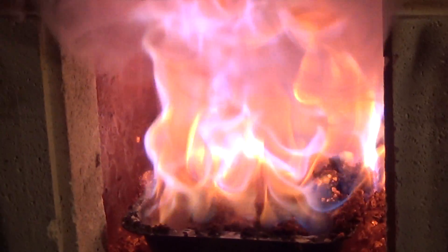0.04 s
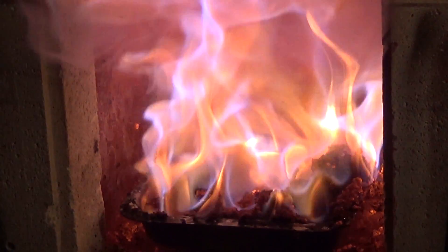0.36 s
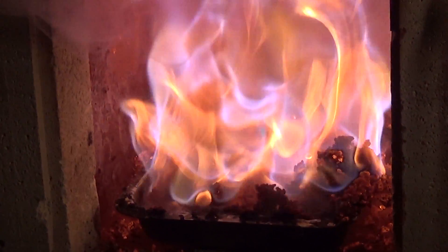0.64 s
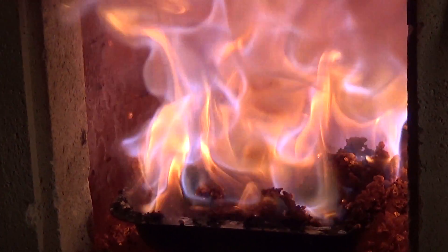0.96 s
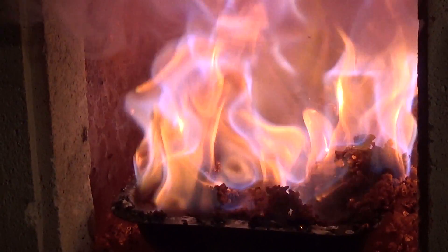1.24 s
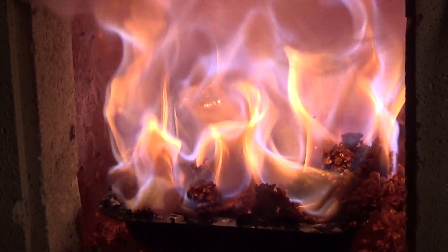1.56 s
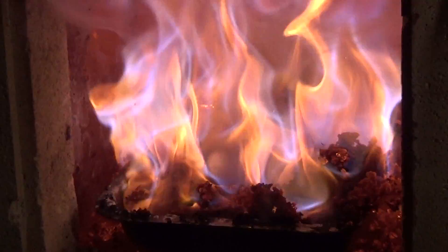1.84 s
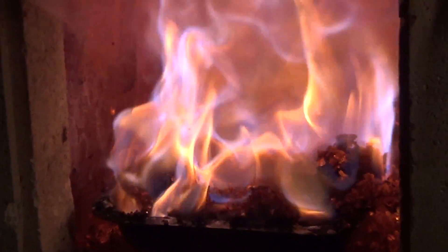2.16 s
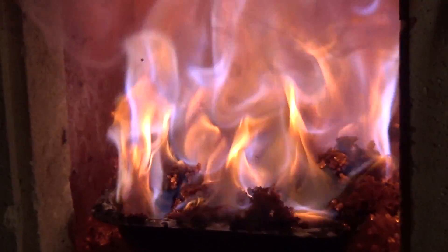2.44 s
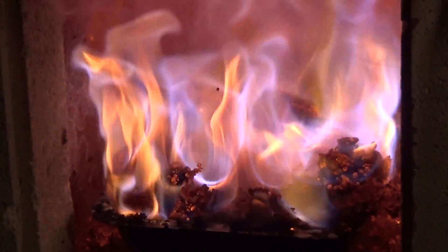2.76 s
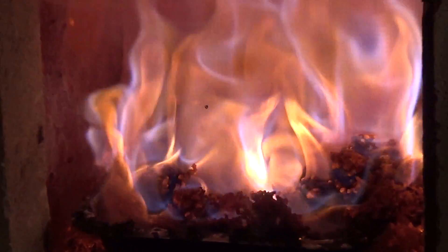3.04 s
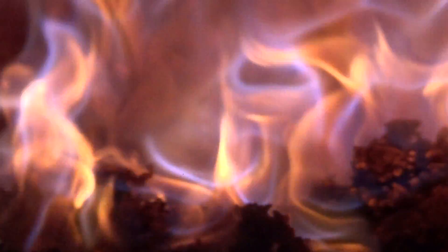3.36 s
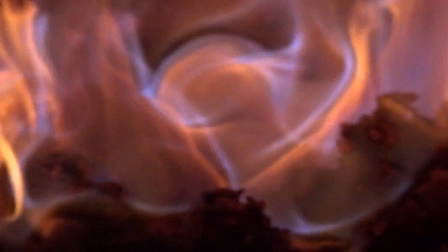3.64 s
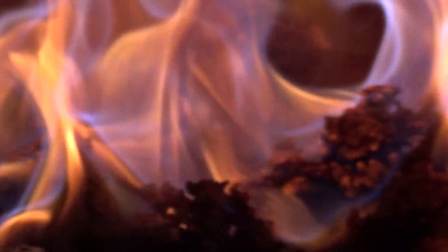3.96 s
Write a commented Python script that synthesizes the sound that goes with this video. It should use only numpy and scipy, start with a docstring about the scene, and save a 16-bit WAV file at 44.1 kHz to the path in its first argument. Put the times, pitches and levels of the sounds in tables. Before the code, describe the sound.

Burning fuel sizzles brightly in surges over softly roaring, puffing furnace flames.

```python
"""At the open door of a small furnace, close to flames that stand over a tray of embers.
Gas escaping from the hot fuel sizzles brightly in surges, over a steady rush of air.
The flames roar dully, flutter and puff, and the puffs make the chamber ring with low notes.
A faint hum lies underneath, a deep drone dies away early, and one ember snaps."""
import sys
import numpy as np
from scipy import signal
from scipy.fft import rfft, irfft
from scipy.io import wavfile

SR = 44100
rng = np.random.default_rng(int(sys.argv[2]) if len(sys.argv) > 2 else 0)


def wrap_up_sound(samples):
    """Save the sound to the file named by the first command line argument, as 16-bit audio."""
    columns = np.atleast_2d(samples).T
    # keep every value between -1 and 1, then stretch to whole-number steps
    tamed = np.clip(columns, -1, 1)
    steps = np.round(tamed * 32767).astype(np.int16)
    wavfile.write(sys.argv[1], SR, steps)


N = 176400
T = np.arange(N) / SR
FREQS = np.maximum(np.arange(N // 2 + 1) * SR / N, 1)  # Hz at each point of a spectrum


def from_db(db):
    """Turn decibels into a number to multiply a sound by."""
    return 10 ** (np.asarray(db) / 20)


def rms_one(x):
    """Scale a sound so that its average strength (rms) is 1."""
    return x / np.sqrt(np.mean(x ** 2) + 1e-20)


def level(rows):
    """A volume curve through rows of (time [s], level [dB])."""
    return from_db(np.interp(T, *np.transpose(rows)))


def burst(start, fade_s):
    """A volume curve that jumps to 1, then falls 60 dB in fade_s seconds."""
    return (T >= start) * np.exp(-np.log(1000) * np.abs(T - start) / fade_s)


def drift(rate_hz):
    """A smooth random wander of typical size 1; a higher rate wanders faster."""
    step, warm_up = 40, 2000
    r = np.exp(-2 * np.pi * rate_hz * step / SR)
    noise = rng.standard_normal(N // step + warm_up + 2)
    slow = signal.lfilter([1], [1, -2 * r, r * r], noise)[warm_up:]
    return np.interp(np.arange(N) / step, np.arange(len(slow)), rms_one(slow))


def stereo_noise(side_db):
    """Even hiss for two ears; the lower side_db, the more alike they are."""
    mid, side = rng.standard_normal((2, N))
    return rms_one(mid + from_db(side_db) * side * np.array([[1], [-1]]))


def clicks(per_s, spread_db):
    """Clicks at random moments, some stronger than others."""
    sizes = from_db(spread_db * np.minimum(rng.exponential(1, N), 4))
    return (rng.random(N) < per_s / SR) * sizes * rng.choice([-1, 1], N)


def colour(x, rows):
    """Shape a sound's lows and highs by rows of (frequency [Hz], level [dB]), at strength 1."""
    hz, db = np.transpose(rows)
    gain = from_db(np.interp(np.log(FREQS), np.log(hz), db))
    return rms_one(irfft(rfft(x) * gain, N))


def flicker(x, depth_db, rate_hz):
    """Let ten bands, a third of an octave apart from 2000 Hz up, each flicker on its own."""
    position = np.clip(3 * np.log2(FREQS / 2000), 0, 9)  # the first band also holds all the lows
    weights = (np.maximum(1 - np.abs(position - k), 0) for k in range(10))
    bands = (irfft(rfft(x) * weight, N) for weight in weights)
    return rms_one(sum(band * from_db(depth_db * drift(rate_hz)) for band in bands))


def resonate(x, hz, width_hz):
    """Make a sound ring at one pitch; a narrower width rings longer."""
    r = np.exp(-np.pi * width_hz / SR)
    feedback = [1, -2 * r * np.cos(2 * np.pi * hz / SR), r * r]
    return signal.lfilter(np.array([1, 0, -1]) * (1 - r * r) / 2, feedback, x + 1e-18)


def sizzle():
    """Gas escapes from the hot fuel: a fine hiss and many tiny bursts, surging together."""
    # how the sizzle swells and sinks: (time [s], relative level [dB])
    surges = [(0.0, -23), (0.05, -26.5), (0.12, -22.5), (0.24, -24), (0.38, -21.5), (0.58, -23),
              (0.62, -27.5), (0.73, -22.5), (0.85, -25.5), (0.93, -21), (0.98, -23), (1.0, -22),
              (1.14, -25.5), (1.3, -22), (1.34, -25), (1.49, -22), (1.54, -25), (1.71, -25), (1.83, -22.5),
              (1.9, -26.5), (2.1, -24.5), (2.24, -26.5), (2.28, -22), (2.32, -26), (2.56, -23.5),
              (2.62, -26.5), (2.64, -25), (2.72, -28.5), (2.8, -23.5), (3.27, -29), (3.35, -24.5),
              (3.38, -26), (3.68, -27), (3.71, -28), (3.87, -24), (4.0, -26)]
    # its bright tone: (frequency [Hz], relative level [dB])
    tone = [(3000, -23), (5200, -17.5), (6100, -8.5), (7000, -11), (7600, -4), (8500, -3), (9600, .5),
            (10900, -6), (12300, -10), (14300, -17.5), (16000, -23)]
    hiss = stereo_noise(side_db=-22.5)
    bursts = from_db(-8) * rms_one(clicks(per_s=7000, spread_db=3))
    tremble_db = 0.35 * drift(7.6) + 0.28 * drift(120)
    gas = flicker(colour(hiss + bursts, tone), depth_db=1.0, rate_hz=25)
    return gas * level(surges) * from_db(0.5 + tremble_db)


def air_rush():
    """Air streams through the fire and makes the chamber ring at its higher pitches."""
    # small rises and dips in the air's hiss: (time [s], relative level [dB])
    swells = [(0.0, -29.5), (0.04, -31), (0.34, -30.5), (0.41, -28), (0.43, -30), (1.94, -31.5),
              (1.95, -33), (2.07, -30.5), (2.14, -32.5), (2.6, -29.5), (2.61, -31.5), (2.84, -32.5),
              (2.85, -27), (2.87, -33), (2.97, -29.5), (3.06, -32), (3.1, -31.5), (3.27, -32.5),
              (3.42, -29.5), (3.75, -33.5), (3.88, -31.5), (4.0, -34)]
    # the tone of that hiss: (frequency [Hz], relative level [dB])
    tone = [(300, -14.5), (900, -22), (1500, -10.5), (1750, -4.5), (2130, -7.5), (2450, -0.5), (2800, -2.5),
            (3800, -0.5), (4700, -4), (5400, -5.5), (7000, -6), (14000, -56)]
    # the chamber's high notes: (pitch [Hz], width of each filter pass [Hz], level [dB])
    high_notes = [(1178, 183, -47.5), (1336, 59, -53), (1863, 150, -50), (2460, 400, -49.5)]
    hiss = flicker(colour(stereo_noise(side_db=-18), tone), depth_db=1.3, rate_hz=14)
    air = stereo_noise(side_db=-18)
    ringing = 0
    for hz, width, db in high_notes:
        note = resonate(resonate(air, hz, width), hz, width)
        ringing += from_db(db + drift(5.4)) * rms_one(note)
    return hiss * level(swells) * from_db(0.5) + ringing


def flames():
    """The flames roar dully and flutter with many small puffs, slowly easing a little."""
    # the roar's deep tone: (frequency [Hz], relative level [dB])
    tone = [(25, -24), (45, -25), (75, -1.5), (130, -3.5), (220, 4), (350, 1), (480, 0.5), (650, -5),
            (900, -19.5), (1500, -18)]
    roar = colour(stereo_noise(side_db=-19.5), tone) * from_db(-44 + 2.0 * drift(10))
    flutter = from_db(-41.5) * rms_one(chamber(clicks(per_s=420, spread_db=4)))
    easing = from_db(-0.38 * (T - T.mean()))  # 0.38 dB quieter each second
    return (roar + flutter) * easing


def chamber(kicks):
    """Soft kicks of air pressure ring the chamber's low notes and are also faintly heard directly."""
    # the chamber's low notes: (pitch [Hz], time to fade 60 dB [s], relative level [dB])
    low_notes = [(96, 0.18, -13.5), (175, 0.069, -5.5), (228, 0.054, -3), (300, 0.068, -9.5)]
    soft = signal.sosfilt(signal.butter(1, 700, fs=SR, output="sos"), kicks + 1e-18)
    ringing = 0
    for k, (hz, fade_s, db) in enumerate(low_notes):
        width_hz = np.log(1000) / (np.pi * fade_s)
        ringing += (-1) ** k * from_db(db) * resonate(soft, hz, width_hz)  # every other note is flipped
    return ringing + from_db(-27.5) * soft


def hum_and_drone():
    """A low hum wavers while a deeper drone dies away."""
    # how the drone fades: (time [s], level [dB])
    drone_fade = [(0, -49), (.1, -48), (.6, -55), (1.15, -58), (1.45, -85), (4, -80)]

    def tone(hz, wander_hz):
        pitch = hz + wander_hz * drift(4.48)
        return np.sqrt(2) * np.sin(2 * np.pi * np.cumsum(pitch) / SR)

    hum = from_db(-56 + 3.5 * drift(9)) * tone(hz=94.2, wander_hz=2.87)
    drone = level(drone_fade) * tone(hz=41.3, wander_hz=1.7)
    return hum + drone


def workroom():
    """Faint noise comes from all around the room, so each ear gets its own."""
    # the room's soft tone: (frequency [Hz], relative level [dB])
    tone = [(30, -20), (200, -5), (450, -1), (900, 1), (1500, -1), (2200, -21), (6000, -18), (16000, -38)]
    return from_db(-54.5) * colour(rng.standard_normal((2, N)), tone)


def puffs():
    """Strong puffs of flame thump the chamber and crackle as they catch fire."""
    # each puff: (time [s], relative level [dB], crackle level added to that [dB])
    puff_list = [(0.313, -25.5, -20), (0.395, -24.5, -1), (0.73, -29.5, -12), (0.769, -24.5, -17),
                 (0.916, -28, -6), (1.248, -28, -11), (1.370, -22.5, -6), (1.857, -31.5, -1),
                 (2.105, -31, -5), (2.623, -30, -14), (2.704, -28.5, -15), (3.021, -23, -5),
                 (3.14, -22, -31), (3.264, -29, -23), (3.448, -24.5, -15)]
    # the crackle's tone: (frequency [Hz], relative level [dB])
    crackle_tone = [(60, 4), (250, 0), (600, -18), (1300, -7), (2500, -16), (8000, -31)]
    kicks, crackle_volume = np.zeros((2, N))
    for start, db, crackle_db in puff_list:
        kicks[int(start * SR)] = from_db(db + 2)
        crackle_volume += from_db(db + crackle_db) * burst(start, fade_s=0.053)
    one_kick_peak = np.abs(chamber(signal.unit_impulse(SR // 10))).max()
    thumps = chamber(kicks) / one_kick_peak
    return thumps + crackle_volume * colour(rng.standard_normal(N), crackle_tone)


def ember_snap():
    """One ember cracks with a very short, bright ring."""
    # the ember's ringing notes: (pitch [Hz], relative level [dB])
    notes = [(2700, -12), (9800, 0), (12500, -9)]
    start = 2.838  # seconds
    ring = sum(from_db(db) * np.sin(2 * np.pi * hz * (T - start)) for hz, db in notes)
    return from_db(-1) * ring * burst(start, fade_s=0.005)


def pan(left_db):
    """Turn the left ear up and the right ear down; a negative number does the opposite."""
    return from_db([[left_db], [-left_db]])


def scene():
    """The furnace sounds come from almost straight ahead, over the faint room."""
    room = workroom()
    highs = sizzle() + air_rush() + ember_snap()
    lows = flames() + puffs() + hum_and_drone()
    return highs * pan(left_db=0.12) + lows * pan(left_db=-0.4) + room


def record(dry):
    """Cut the deepest bass, turn loud peaks down for a moment, then cut the highest treble."""
    limit_db, recovery_db_per_s = -7.5, 330
    bass_cut = signal.butter(2, 37, "high", fs=SR, output="sos")
    treble_cut = signal.ellip(12, 0.1, 80, 15700, fs=SR, output="sos")
    sound = signal.sosfilt(bass_cut, dry)
    peak_db = 20 * np.log10(np.abs(sound).max(axis=0) + 1e-9)
    over_db = np.maximum(peak_db - limit_db, 0)
    recovery_db = recovery_db_per_s * T
    dip_db = np.maximum.accumulate(over_db + recovery_db) - recovery_db  # dips at once, then recovers
    return signal.sosfilt(treble_cut, sound * from_db(-dip_db))


dry = scene()
out = record(dry)
wrap_up_sound(out)
```